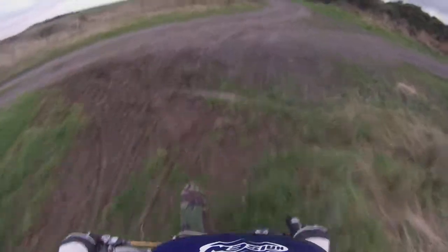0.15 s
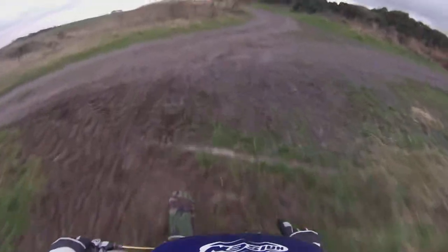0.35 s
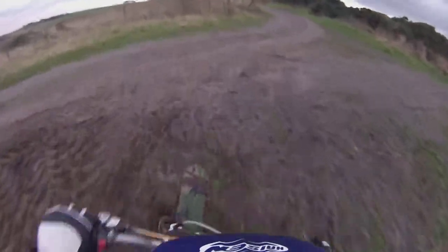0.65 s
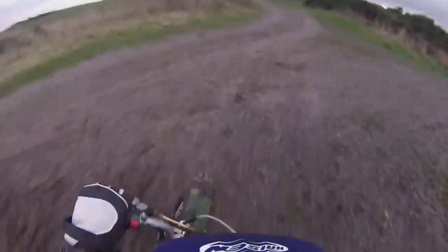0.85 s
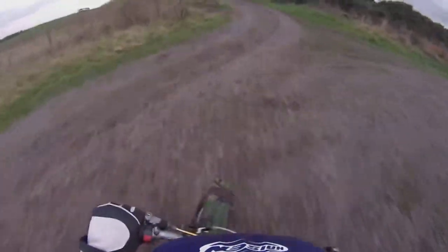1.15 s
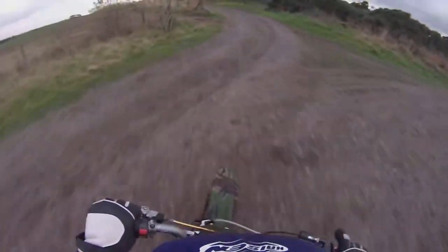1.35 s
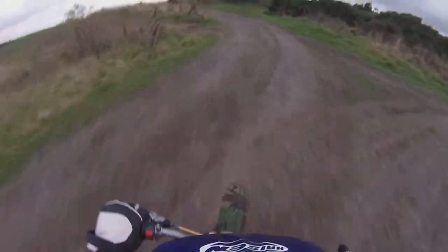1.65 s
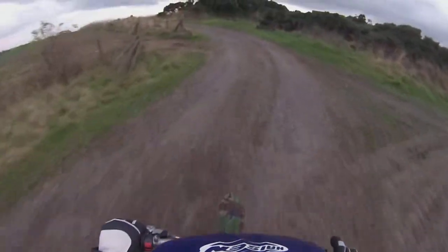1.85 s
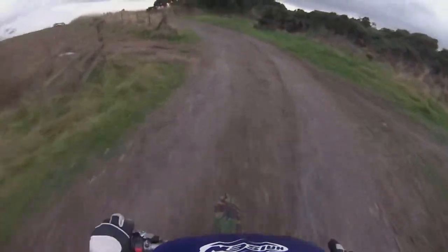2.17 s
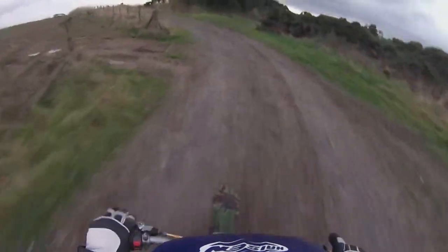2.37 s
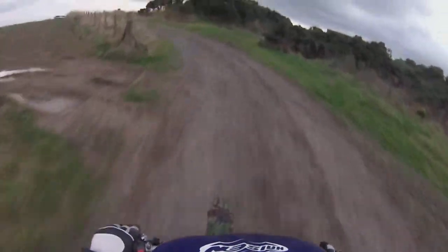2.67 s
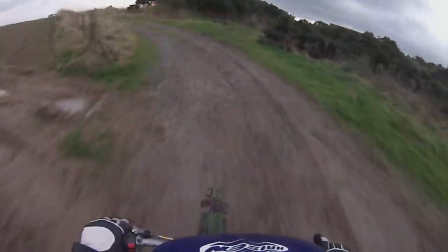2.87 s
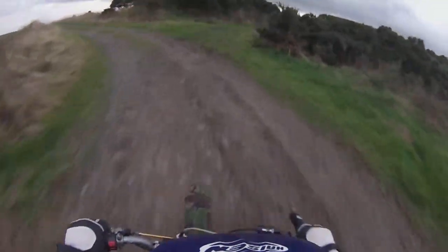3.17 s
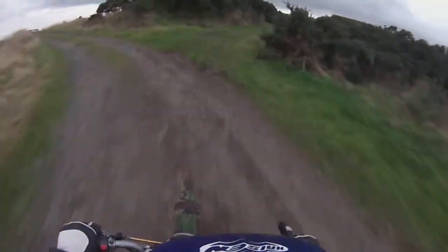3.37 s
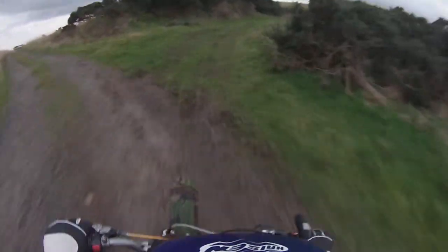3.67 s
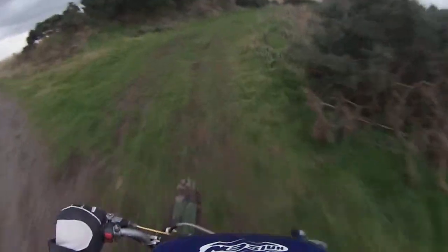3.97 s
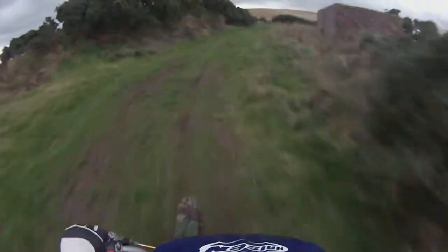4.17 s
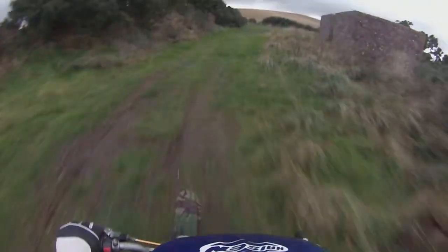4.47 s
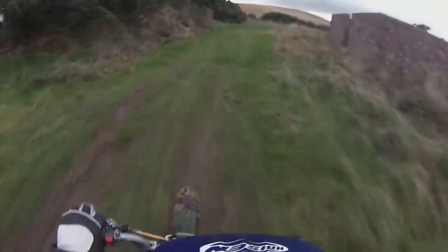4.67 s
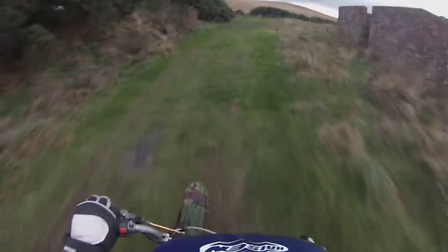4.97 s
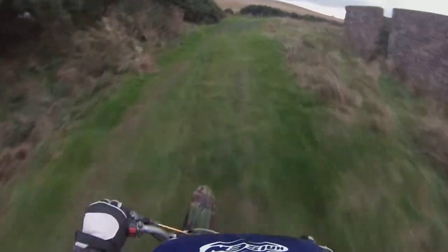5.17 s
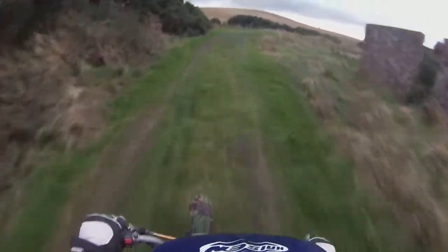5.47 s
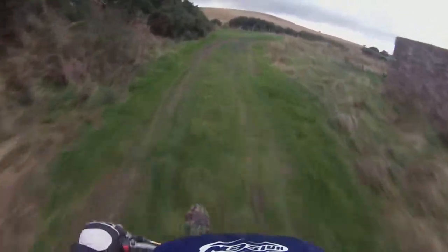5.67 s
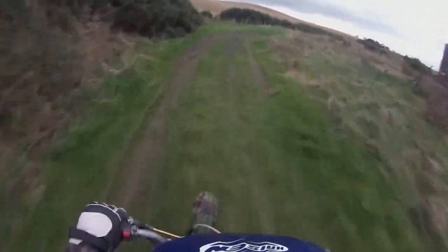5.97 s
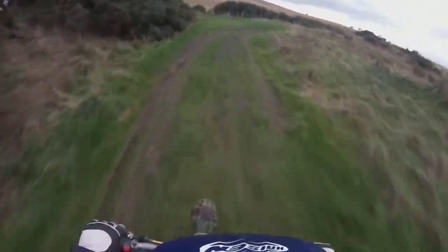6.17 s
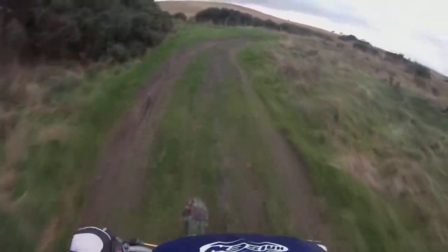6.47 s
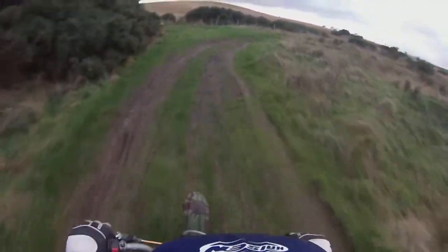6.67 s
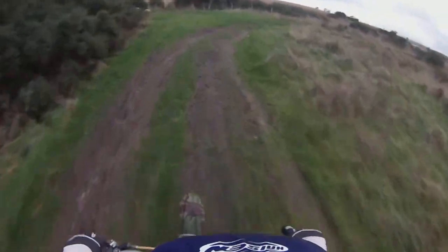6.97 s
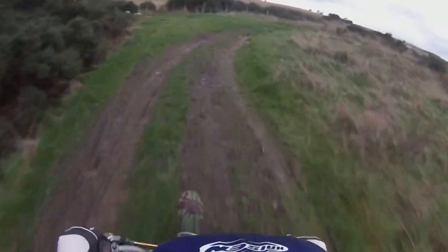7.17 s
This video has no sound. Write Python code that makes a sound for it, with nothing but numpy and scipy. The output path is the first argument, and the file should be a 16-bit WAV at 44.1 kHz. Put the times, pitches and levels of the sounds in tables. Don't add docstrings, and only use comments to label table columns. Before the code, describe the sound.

Single-cylinder motorbike engine under load, boxy and muffled through a closed microphone housing. It starts at a low throb, climbs to a buzzing rasp, dips sharply, and pulls again with hissing exhaust and metallic rattle. Light knocks accompany bumps and low wind buffets come and go. Near the end the exhaust falls away, leaving drivetrain hum, tyre rumble, two quick chain slaps and clatter.

```python
import sys
import numpy as np
from scipy import signal
from scipy.fft import rfft, irfft, next_fast_len
from scipy.io import wavfile
from scipy.ndimage import uniform_filter1d, map_coordinates

SR = 44100
rng = np.random.default_rng(int(sys.argv[2]) if len(sys.argv) > 2 else 0)


def pcm_store(signal):
    levels = np.round(np.clip(np.atleast_2d(signal), -1, 1) * 32767)
    wavfile.write(sys.argv[1], SR, levels.astype(np.int16).T)


def undo_db(level):
    steps = np.asarray(level, float) / 20
    return 10 ** steps


N = 323253

# start_s, throttle (0 shut to 1 open), exhaust_pulse_db
THROTTLE = [(0, 0.6, -30), (.75, 0.65, -27), (.9, 0.72, -28.5), (1.42, .65, -26.5), (1.52, 0.84, -24),
            (2.55, 0.81, -21), (3.13, 0.86, -21.5), (3.2, 0.33, -31), (3.53, 0.1, -31.5), (3.59, 0.62, -28),
            (3.76, .75, -22), (4.03, 0.85, -24), (4.18, 0.56, -29.5), (4.33, 0.83, -22.5),
            (5.26, 0.83, -21), (5.35, 0.38, -34.5), (6.2, 0.22, -40), (7.33, 0.15, -53)]
# start_s, gear_and_chain_rattle_db, tyre_and_frame_rumble_db
ROUGHNESS = [(0, -42, -42), (.6, -40, -33.5), (.8, -38.5, -37), (1.4, -40.5, -36), (1.6, -35.5, -50.5),
             (3.05, -30.5, -33), (3.45, -40, -41), (4.0, -30.5, -33), (4.2, -35.5, -35), (4.28, -28, -35),
             (4.6, -31, -31.5), (5.4, -30, -30.5), (5.75, -31.5, -34), (6.1, -36.5, -34),
             (6.27, -33.5, -34), (6.42, -40, -41.5), (6.55, -40.5, -35.5), (7.33, -41, -34.5)]


def unit(x):
    return x / np.sqrt(np.mean(x ** 2) + 1e-20)


def curves(rows):
    s, *cols = np.transpose(rows)
    return [np.interp(np.arange(N) / SR, s, c) for c in cols]


def wobble(rate):
    knots = rng.standard_normal(int(N * rate / SR) + 4)
    return map_coordinates(knots, [np.arange(N) * rate / SR])


def swells(s, spread, size):
    t = np.arange(N) / SR
    return sum(a * np.exp(-.5 * ((t - at) / w) ** 2) for at, w, a in np.broadcast(s, spread, size))


def coloured(x, points):
    m = next_fast_len(N + 8192)
    f, db = np.transpose(points)
    gain = undo_db(np.interp(np.log(np.fft.rfftfreq(m, 1 / SR) + 1), np.log(f + 1), db))
    return unit(irfft(rfft(x, m) * gain, m)[:N])


def ringing(x, modes):
    m = next_fast_len(N + 8192)
    f = np.fft.rfftfreq(m, 1 / SR)
    ring = sum(undo_db(db) * 1j * f * w / (c * c - f * f + 1j * f * w) for c, w, db in modes)
    return irfft(rfft(x, m) * (1 + ring), m)[:N]


def crank_turning():
    # start_s, firings_per_s
    speed = [(0.0, 35.06), (0.74, 40.71), (1.54, 42.23), (2.338, 55.76), (3.14, 63.46), (3.34, 55.28),
             (3.5, 49.82), (3.581, 42.09), (3.688, 44.63), (4.02, 46.94), (4.51, 45.44), (4.834, 49.55),
             (5.021, 49.32), (5.263, 51.75), (5.521, 42.91), (6.118, 39.12), (7.33, 34.14)]
    # start_s (middle of the jolt), change in firings_per_s
    jolts = [(0.453, 0.25), (0.716, 1.7), (0.924, -1.79), (1.214, 0.9), (1.387, -2.92), (1.54, 2.44),
             (1.565, -2.76), (1.71, 1.29), (2.02, 1.48), (2.051, -1.36), (2.252, 1.25), (2.427, -2.82),
             (2.449, 3.55), (3.153, 1.65), (3.174, -4.65), (3.7, 1.39), (4.22, -2.68), (4.44, 0.81)]
    s, change = np.transpose(jolts)
    rate = curves(speed)[0] + swells(s, .044, change)
    turns = np.cumsum(rate) / SR + .534
    return turns, rate


def exhaust(turns):
    # delay_ms, strength, delay_scatter_ms, second_chamber (1 yes, 0 no)
    echoes = [(0, -1.3, 0.019, 0), (1.05, 0.48, 0, 0), (1.8, 0.51, 0, 0), (2.87, -0.59, 0.06, 1),
              (3.6, 0.36, 0, 1), (4.15, 0.38, 0.057, 1), (4.7, -0.18, 0.58, 1), (5.3, 0.3, 0.12, 1),
              (6.1, 0.24, 0.033, 1), (7.4, -0.026, 0, 0), (8.5, 0.21, 0, 0), (10.6, 0.17, 0, 0),
              (13, 0.12, 0.33, 0)]
    # start_s, stretch (times)
    echo_stretch = [(0, 1.06), (.4, 1.12), (.75, 0.88), (1.1, 1.01), (1.45, 0.97), (1.7, 1.066),
                    (2.3, 1.044), (2.55, 1.03), (3.1, 1.04), (3.5, 1.11), (3.65, 1.06), (3.92, .97),
                    (4.2, 1.064), (5.27, 1.01), (6.0, 1.15), (7.33, 1.0)]
    start = np.interp(np.arange(1, int(turns[-1])), turns, np.arange(N))
    first = start.astype(int)
    cycle = np.gradient(start)
    throttle, pulse_db = (c[first, None] for c in curves(THROTTLE))
    stretch = curves(echo_stretch)[0][first, None]
    delay, strength, scatter, chamber = np.transpose(echoes)
    count = len(echoes)

    luck = rng.standard_normal((len(start), 2 * count + 1))
    arrive = delay * stretch + scatter * luck[:, 1:count + 1] + 0.046 * luck[:, [1]]
    second = 0.14 + (1.41 - 0.14) * throttle
    size = strength * np.where(chamber > .5, second, 1)
    size = size * (1 + 0.03 * luck[:, count + 1:])
    width = (.74 - 0.58 * np.clip(throttle, 0, 1)) * (1 + 0.015 * delay)  # ms, later echoes smear
    width = width * (cycle[:, None] * 48 / SR) ** 0.54

    step = np.arange(-150, 850)
    ms = (step - (start - first)[:, None]) * 1000 / SR
    shape = sum(size[:, [k]] * np.exp(-.5 * ((ms - arrive[:, [k]]) / width[:, [k]]) ** 2)
                for k in range(count))
    shape *= np.sqrt(cycle / np.sum(shape ** 2, axis=1))[:, None]
    shape *= undo_db(pulse_db - 5.0 + 0.29 * luck[:, [0]])
    at = first[:, None] + step - step[0]
    return np.bincount(at.ravel(), shape.ravel(), N + len(step))[-step[0]:][:N]


def pipe_ring(pulses):
    # pitch_hz, width_hz, level_db
    pipe_modes = [(132, 48, 4), (422, 218, -1), (625, 34, -4.5), (813, 19, 11.5), (1120, 38, -1),
                  (1290, 120, 6), (2030, 120, -19)]
    drive = np.clip(4.5 * curves(THROTTLE)[0] - .3, .1, 1)
    return (1 - drive) * pulses + ringing(drive * pulses, pipe_modes)


def gas_hiss(turns, rate):
    # pitch_hz, level_db (per Hz)
    hiss_colour = [(530, -53), (900, -11), (964, -23.5), (1130, -11.5), (1310, 0), (1620, -3.5),
                   (1770, -15.5), (2080, -5), (2620, -29), (4290, -30), (4700, -33.5), (6200, -44),
                   (9050, -51.5), (14000, -78)]
    throttle, pulse_db = curves(THROTTLE)
    ms = turns % 1 / rate * 1000
    burst = ms ** 2 * np.exp(-ms / 1.45) + .12
    strength = undo_db(1.3 * rng.standard_normal(int(turns[-1]) + 1))[turns.astype(int)]
    drift = 5
    patterns = rng.standard_normal((int(N * drift / SR) + 4, SR // 20))
    alike = unit(map_coordinates(patterns, [np.arange(N) * drift / SR, ms * SR / 1000]))
    share = .55
    swirl = np.sqrt(share) * alike + np.sqrt(1 - share) * rng.standard_normal(N)
    shut_db, open_db = -34.5, -0.5
    hiss_db = pulse_db + shut_db + (open_db - shut_db) * throttle
    return undo_db(hiss_db) * coloured(burst * strength * swirl, hiss_colour)


def gear_rattle(turns):
    # pitch_hz, level_db (per Hz)
    rattle_colour = [(350, -25), (600, -9.5), (761, -10.5), (939, -14.5), (1310, 3), (1700, -4),
                     (2020, 1.5), (2960, -18), (3750, -19), (4220, -23.5), (6690, -29.5), (8480, -40.5),
                     (10800, -44.5), (14000, -57)]
    knock = 1 + 0.089 * np.cos(4 * np.pi * turns + 1.0)
    uneven = undo_db(0.58 * wobble(13) + 0.48 * wobble(30) + 0.83 * wobble(220))
    rattle = coloured(knock * uneven * rng.standard_normal(N), rattle_colour)
    return undo_db(curves(ROUGHNESS)[0]) * rattle


def casing_ring(noise):
    # pitch_hz, width_hz, level_db
    casing_modes = [(3012, 120, -1), (3830, 54, -2), (4710, 240, -5), (5700, 170, -12.5), (6580, 210, -9.5),
                    (9000, 500, -16), (10800, 500, -12)]
    return ringing(noise, casing_modes)


def valves(turns, rate):
    # pitch_hz, level_db (per Hz)
    valve_colour = [(3000, -46), (4600, -14), (5700, -3), (6600, 3), (7600, -6), (8700, -1.5),
                    (10500, -6.5), (14000, -24)]
    taps = sum(size * np.exp(-((turns - at) % 1) / rate / 0.0076) for at, size in ((.12, 1), (.58, 0.36)))
    level_db = -79.0 + 16.3 * curves(THROTTLE)[0] + 1.5 * wobble(11)
    return undo_db(level_db) * coloured(taps * rng.standard_normal(N), valve_colour)


def crank_shake(turns, rate):
    # pitch_hz, width_hz, level_db
    frame_modes = [(80, 5.5, 5), (104, 4.5, -5), (117, 14, 5.5)]
    mounts = 1 + sum(undo_db(db) / np.hypot(1, 2 * (2 * rate - hz) / w) for hz, w, db in frame_modes)
    level_db = -50.5 + 7.5 * curves(THROTTLE)[0] + 0.69 * wobble(11)
    lag = .04 * (rate - 48)
    return mounts * undo_db(level_db) * np.sin(4 * np.pi * turns - lag)


def engine():
    turns, rate = crank_turning()
    pipe = pipe_ring(exhaust(turns))
    casing = casing_ring(gas_hiss(turns, rate) + gear_rattle(turns))
    return pipe + casing + valves(turns, rate) + crank_shake(turns, rate) + coasting(turns)


def wind():
    # pitch_hz, level_db (per Hz)
    wind_colour = [(3, 24), (8, 35), (22, 31.5), (50, -17), (90, -36), (200, -54), (500, -120)]
    # pitch_hz, level_db (per Hz)
    rumble_colour = [(26, -13), (45, -6), (92, -4), (152, -14), (169, -15.5), (276, -17), (381, -18.5),
                     (427, -15), (479, -25.5), (700, -35), (910, -28), (1540, -120)]
    # start_s (middle of the gust), spread_s, peak_db
    gusts = [(.1, .06, -34), (.5, 0.045, -33), (.83, 0.14, -26), (1.12, 0.06, -29), (1.69, 0.025, -29.5),
             (2.6, 0.13, -32), (3.2, .12, -28), (3.53, .03, -29), (4.05, 0.16, -34), (4.29, 0.11, -24.5),
             (4.6, 0.053, -30), (5.22, 0.044, -35), (5.5, .15, -28), (6.0, 0.14, -37), (6.66, .08, -30)]
    buffet = unit(undo_db(3.2 * wobble(8)) * coloured(rng.standard_normal(N), wind_colour))
    rumble = unit(undo_db(1.4 * wobble(14)) * coloured(rng.standard_normal(N), rumble_colour))
    s, spread, db = np.transpose(gusts)
    strength = undo_db(-41) + swells(s, spread, undo_db(db))
    return strength * buffet + undo_db(curves(ROUGHNESS)[1]) * rumble


def loose_parts():
    # start_s, peak_db, pitch_hz
    knocks = [
        (1.4386, -29, 2920),
        (1.948, -32, 4720),
        (3.8994, -39, 3110),
        (5.1694, -30, 3320),
        (5.256, -25, 3800),
        (6.5255, -38, 3170),
        (6.6787, -40.5, 4730),
        (6.9694, -46, 3000),
    ]
    # start_s, peak_db, pitch_hz
    slaps = [
        (3.4999, -16, 1250),
        (3.5005, -20, 1430),
        (3.5, -26, 850),
        (6.2194, -18, 1990),
        (6.2542, -15, 1870),
    ]
    out, t = np.zeros(N + SR), np.arange(SR // 20) / SR
    for s, db, hz in knocks + slaps:
        wander = 0.15 * np.cumsum(uniform_filter1d(rng.standard_normal(len(t)), size=24))
        ring = np.sin(2 * np.pi * hz * t + wander) * (1 - np.exp(-t / 0.0017)) ** 2
        out[round(s * SR):][:len(t)] += undo_db(db - 1.0 - 60 * t / 0.031) * ring
    return out[:N]


def coasting(turns):
    # start_s, length_s, order (cycles per firing), level_db
    hums = [(3.19, .33, 4, -36.5), (3.19, 0.36, 5, -37.5), (3.19, .3, 7, -46), (3.18, 0.4, 12, -48),
            (5.36, 0.53, 3, -37), (5.36, 0.67, 9, -41), (5.5, .45, 5, -40), (5.295, 0.4, 2, -33),
            (5.61, .35, 7, -46), (5.954, .4, 3, -39), (6.75, 0.65, 3, -38.5), (6.75, 0.49, 4, -43.5)]
    t = np.arange(N) / SR
    waver = undo_db(1.1 * wobble(9))
    total = np.zeros(N)
    for s, length, order, db in hums:
        fade = np.clip(np.minimum(t - s, s + length - t) / .05, 0, 1)
        total += undo_db(db) * fade * np.sin(2 * np.pi * round(order) * turns)
    return waver * total


def scene():
    return (engine() + wind() + loose_parts())[None]


def roll_off(x):
    return signal.sosfilt(signal.butter(12, 15180, fs=SR, output="sos"), x)


def record(dry):
    # pitch_hz, level_db (per Hz)
    mic_colour = [(3000, -18), (6000, -15), (11000, -8), (15000, -9)]
    hiss = undo_db(-77.0) * coloured(rng.standard_normal(N), mic_colour)
    soft = signal.sosfilt(signal.butter(N=12, Wn=14900, fs=SR, output="sos"), dry + hiss)
    return roll_off(soft - soft.mean())


dry = scene()
out = record(dry)
pcm_store(out)
```